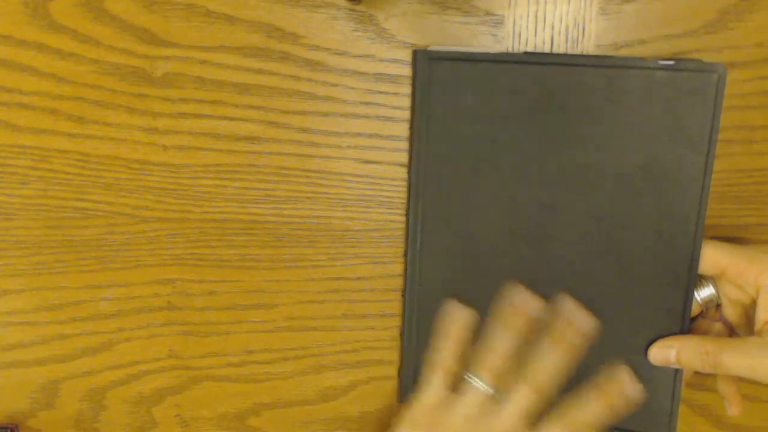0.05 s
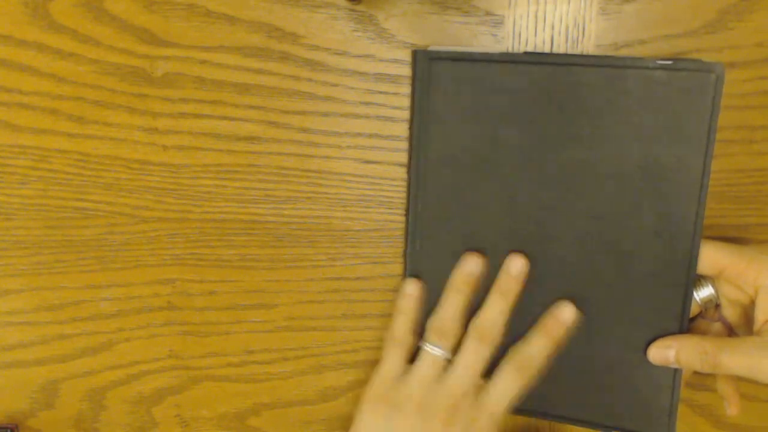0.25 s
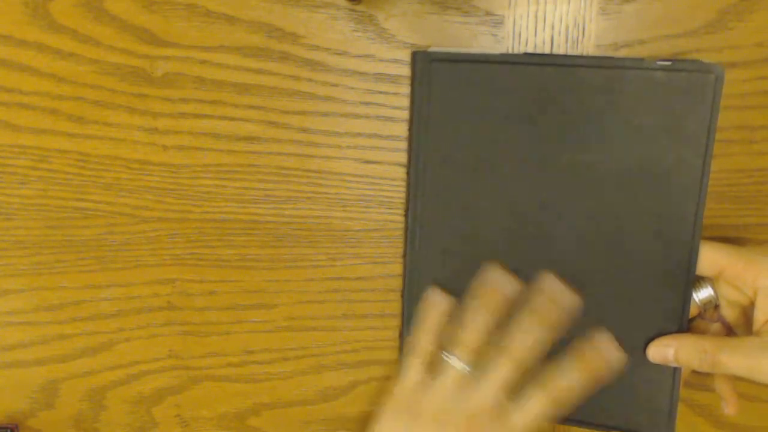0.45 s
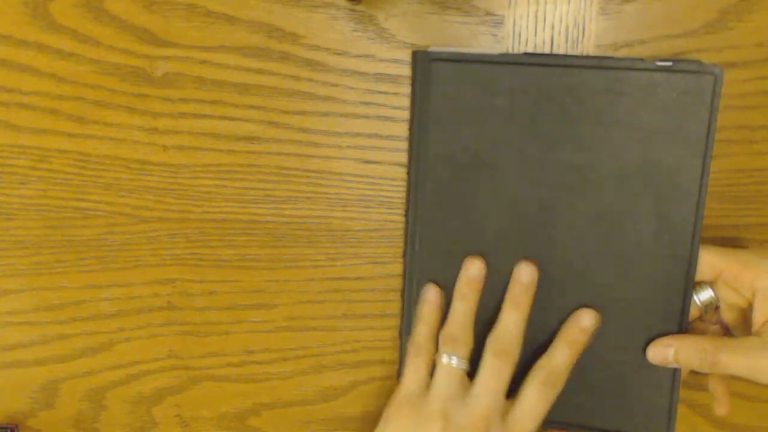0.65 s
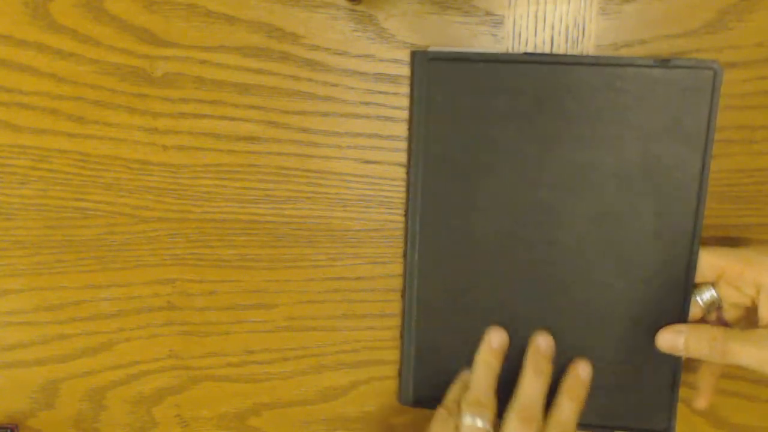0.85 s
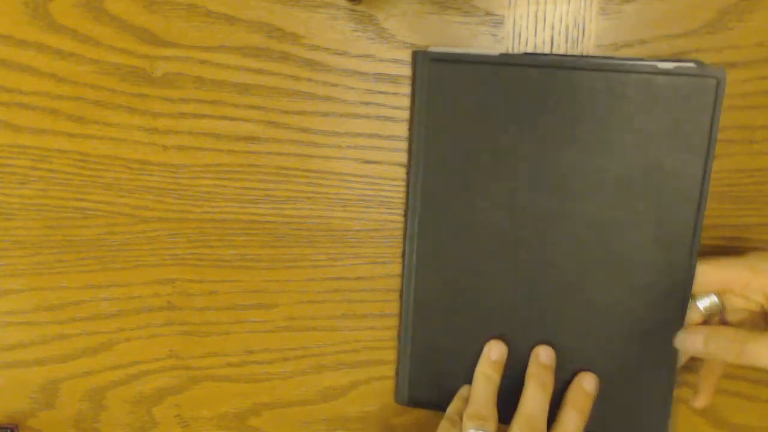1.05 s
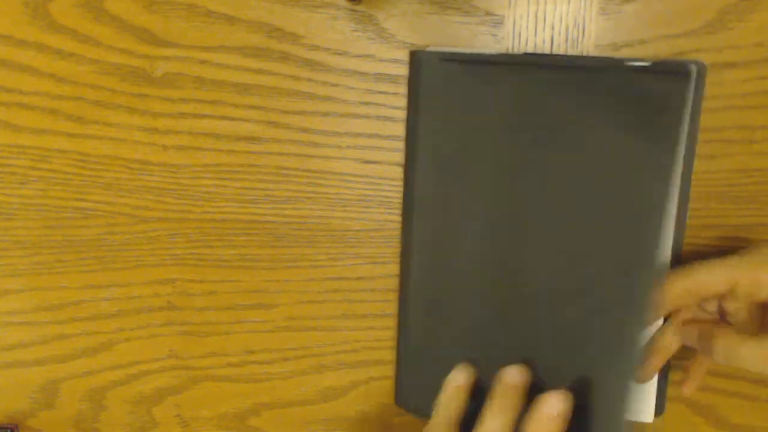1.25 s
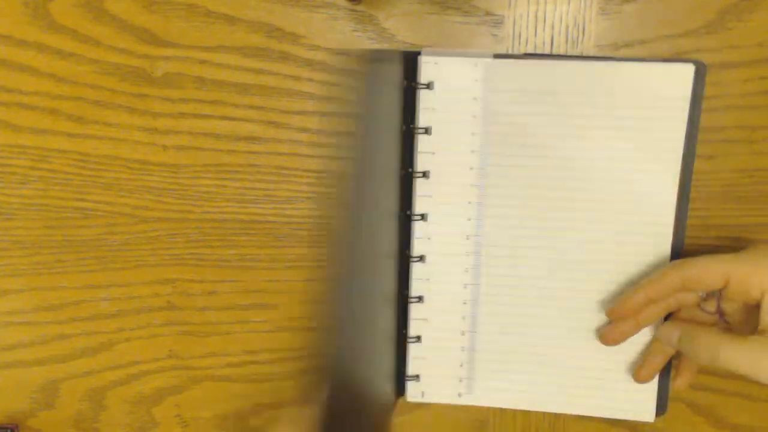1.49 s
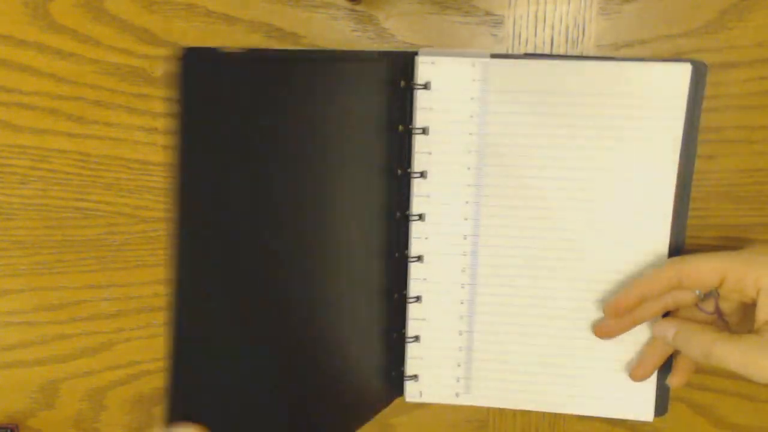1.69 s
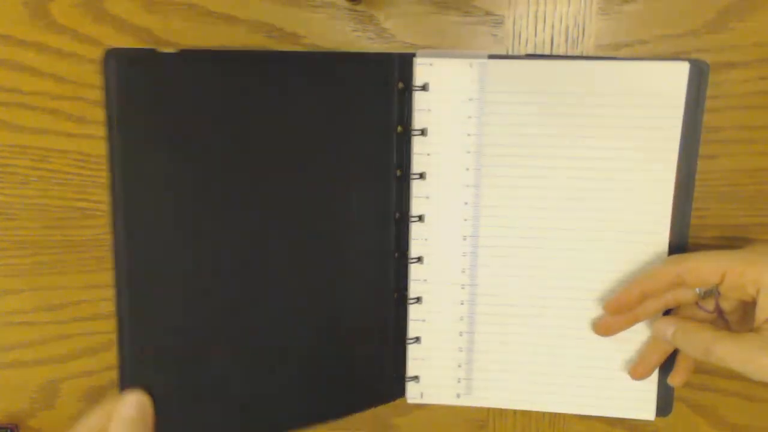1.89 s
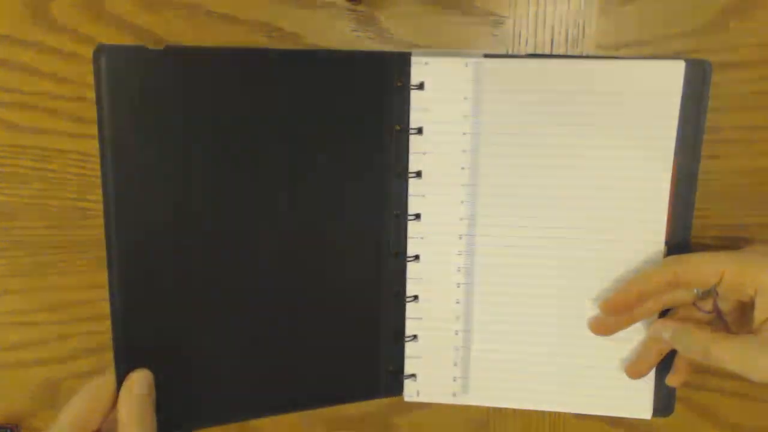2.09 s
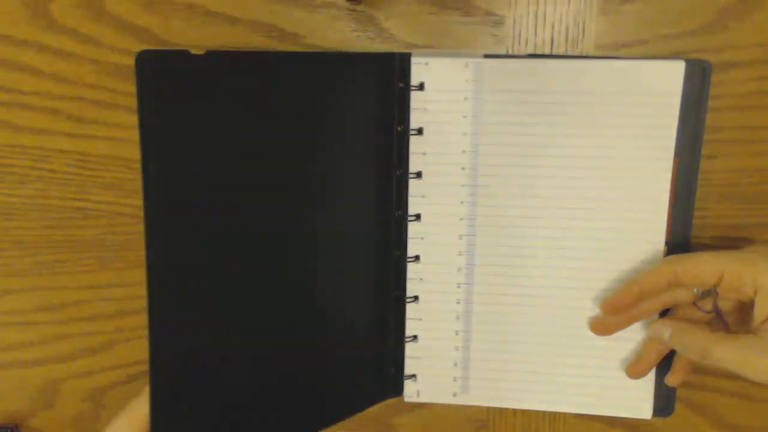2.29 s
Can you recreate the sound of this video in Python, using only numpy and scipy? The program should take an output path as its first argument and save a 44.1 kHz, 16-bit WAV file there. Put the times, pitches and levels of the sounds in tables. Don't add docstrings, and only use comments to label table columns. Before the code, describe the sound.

Notebook cover opening, heard close: soft dry to-and-fro skin strokes, a light knock, a pop with a low puff of air, a brief bright scraping snap, faint sliding and a woody thump over low room hum.

```python
import sys
import numpy as np
from scipy import signal
from scipy.fft import rfft, irfft, next_fast_len
from scipy.io import wavfile
from scipy.ndimage import map_coordinates

SR = 44100
rng = np.random.default_rng(int(sys.argv[2]) if len(sys.argv) > 2 else 0)


def volts_from_decibels(level):
    exponent = np.asarray(level, float) / 20
    return 10 ** exponent


def generate_wav(sig):
    pcm = np.round(np.clip(np.atleast_2d(sig).T, -1, 1) * 32767).astype(np.int16)
    wavfile.write(sys.argv[1], SR, pcm)


N = 102885


def unit(x):
    return x / np.sqrt(np.mean(x ** 2) + 1e-20)


def along(points, hz):
    f, v = np.transpose(points)
    return np.interp(np.log(hz + 1), np.log(f + 1), v)


def filtered(x, response):
    m = next_fast_len(len(x) + 8192)
    spectrum = rfft(x, m) * response(np.fft.rfftfreq(m, 1 / SR))
    return irfft(spectrum, m)[:len(x)]


def peak(f, hz, width_hz):
    return 1j * f * width_hz / (hz * hz - f * f + 1j * f * width_hz)


def wobble(rate_hz):
    return map_coordinates(rng.standard_normal(N // 8), [np.arange(N) * rate_hz / SR])


def arch(start_s, length_s, shape):
    u = np.clip((np.arange(N) / SR - start_s) / length_s, 0, 1)
    return np.abs(np.sin(np.pi * u)) ** shape


def add(track, s, sound):
    track[round(s * SR):][:len(sound)] += sound[:len(track) - round(s * SR)]


def ring(modes, attack_s):
    t = np.arange(SR // 2) / SR
    tones = sum(volts_from_decibels(db - 60 * t / t60_s) * np.sin(2 * np.pi * hz * t) for hz, db, t60_s in modes)
    return tones * (1 - np.exp(-t / attack_s))


def room_tone():
    # (frequency [Hz], density [dB per Hz])
    hiss_points = [(18, -26.5), (30, 1), (64, -22.5), (413, -22.5), (816, -28.5), (1030, -26), (1340, -35),
                   (1940, -36.5), (15800, -51.5)]
    # (centre [Hz], width [Hz], level [dB])
    fan_bands = [(102.6, 14, 6), (125.7, 23, 4), (227.7, 40, -1.5), (450, 69, -8.5), (1083, 45, -3),
                 (1184, 137, -4), (1633, 350, -13), (1937, 150, -11.5)]
    hiss_db, drone_db, sway_db = -65.5, -68.5, -52.5
    sway_hz, sway_width_hz = 13, 8

    def fan(f):
        return sum(volts_from_decibels(db) * peak(f, hz, width_hz) ** 2 for hz, width_hz, db in fan_bands)

    hiss = unit(filtered(rng.standard_normal(N), lambda f: volts_from_decibels(along(hiss_points, f))))
    drone = unit(filtered(rng.standard_normal(N), fan))
    sway = unit(filtered(rng.standard_normal(N), lambda f: peak(f, sway_hz, sway_width_hz) ** 4))
    hiss *= volts_from_decibels(hiss_db + 0.27 * wobble(4.3))
    drone *= volts_from_decibels(drone_db + 0.46 * wobble(7.2))
    return hiss + drone + volts_from_decibels(sway_db) * sway


def reverb(x):
    # (frequency [Hz], t60 [s])
    decay = [(200, 0.75), (2000, 0.31), (10000, 0.12)]
    hz, t, z = signal.stft(rng.standard_normal(SR // 2), SR, nperseg=256)
    z = z * volts_from_decibels(-60 * t / along(decay, hz)[:, None])
    tail = signal.istft(z, SR, nperseg=256)[1]
    delayed = np.pad(x, (200, 0))
    return signal.fftconvolve(delayed, tail / np.linalg.norm(tail))[:N]


def rattle():
    # (time [s], length [s], level [dB], centre [Hz], width [Hz])
    flutters = [(-.1, 0.38, -70, 496, 507), (-.05, 0.27, -69.5, 1894, 250), (0.014, .09, -72, 5130, 300),
                (1.263, .07, -57.5, 1160, 200), (1.269, 0.053, -73.5, 4900, 400),
                (1.271, 0.052, -68, 12700, 1200), (1.318, 0.018, -76, 11400, 505),
                (1.44, 0.044, -70.5, 12500, 1500), (1.445, 0.029, -67, 4570, 310),
                (1.56, 0.035, -51, 940, 247.6), (1.634, 0.11, -70.5, 1140, 150),
                (1.89, 0.089, -88.5, 3560, 400), (2.0, 0.077, -69, 1093, 307),
                (2.014, 0.021, -73.5, 3400, 700), (2.054, 0.13, -77, 4280, 450),
                (2.155, 0.028, -73.5, 4425, 450)]
    out = np.zeros(N)
    for s, length_s, db, hz, width_hz in flutters:
        flutter = unit(filtered(rng.standard_normal(N), lambda f: peak(f, hz, width_hz) ** 2))
        out += volts_from_decibels(db + 3.2 * wobble(180)) * arch(s, length_s, 0.92) * flutter
    return out


def puffs():
    # (time [s], level [dB], frequency [Hz], t60 [s])
    air = [
        (1.262, -34.5, 52, 0.18),
        (1.269, -46.5, 30, .4),
        (1.451, -51.5, 45, .25),
    ]
    out = np.zeros(N)
    for s, db, hz, t60_s in air:
        add(out, s, -ring([(hz, db, t60_s)], attack_s=.006))
    return out


def taps():
    # (time [s], peak level [dB], brightness [Hz])
    hits = [
        (0.9672, -39, 680),
        (1.2592, -35.5, 573),
        (1.577, -47.5, 1000),
        (2.154, -33, 1540),
    ]
    # (frequency [Hz], level [dB], t60 [s])
    table_modes = [(151, -17.5, 0.14), (185.7, -7, 0.2), (214.2, -2, 0.15), (287.8, 1.5, 0.084),
                   (336, -2.5, 0.11), (400, 2, 0.078), (480.7, -1.5, .09), (571, -2, .07), (656, -0.5, .06),
                   (848, -5.5, 0.083), (1080, -2.5, 0.041), (1290, 5.5, 0.039), (1560, -10.5, .03)]
    contact_t60_s, mode_spread = 0.025, .04
    t = np.arange(2000) / SR
    out = np.zeros(N)
    for s, db, hz in hits:
        modes = [(f * (1 + mode_spread * rng.normal()), level + rng.normal(0, 0.81), t60_s)
                 for f, level, t60_s in table_modes]
        contact = 0.027 * rng.standard_normal(len(t)) * volts_from_decibels(-60 * t / contact_t60_s)
        contact[0] = -1
        body = signal.fftconvolve(ring(modes, attack_s=.0008), contact)
        soft = filtered(body, lambda f: 1 / (1 + 1j * f / hz * 1.4 - (f / hz) ** 2) ** 2)
        add(out, s, volts_from_decibels(db - 10.5) * soft)
    return out


def pop():
    # (frequency [Hz], level [dB], t60 [s])
    cover_modes = [(1183, -8, 0.093), (1455, 9, 0.012), (1890, -2, 0.037), (3017, -12.5, 0.012),
                   (4453, -11, 0.016), (10540, -6, .012)]
    pop_s, pop_db = 1.2578, -38.5
    peel_db, peel_rise_s, peel_fall_s = -43.5, 0.00091, 0.0011
    out = np.zeros(N)
    add(out, pop_s, volts_from_decibels(pop_db) * ring(cover_modes, attack_s=0.00053))
    lag_s = np.arange(N) / SR - pop_s - .001
    crack = np.exp(-np.abs(lag_s) / np.where(lag_s < 0, peel_rise_s, peel_fall_s))
    return out + volts_from_decibels(peel_db) * crack * rng.standard_normal(N)


def scrape():
    # (time [s], level [dB])
    force = [
        (1.528, -62.5),
        (1.538, -30),
        (1.558, -23.5),
        (1.574, -47),
        (1.6, -63),
    ]
    # (frequency [Hz], density [dB per Hz])
    plastic = [(290, -68), (500, -24), (1100, -17), (1350, -22), (1730, -16), (3710, -21), (9190, -3.5),
               (14900, -17), (16500, -31.5)]
    slip_rate_hz, scatter_db = 14000, 2.2
    s, force_db = np.transpose(force)
    slips = (rng.random(N) < slip_rate_hz / SR) * rng.standard_normal(N)
    slips *= volts_from_decibels(scatter_db * rng.exponential(size=N))
    crackle = unit(filtered(slips, lambda f: volts_from_decibels(along(plastic, f))))
    return volts_from_decibels(np.interp(np.arange(N) / SR, s, force_db, -200, -200) - 3.5) * crackle


def snaps():
    # (time [s], peak level [dB], centre [Hz])
    big_slips = [(.915, -57, 13000), (1.2024, -61, 14000), (1.5116, -43, 13000), (1.516, -51, 13500),
                 (1.5225, -42, 13440), (1.5312, -36, 6000), (1.5482, -14, 9000), (1.5543, -15.5, 9000),
                 (1.5551, -6.5, 9500), (1.561, -16, 8500), (1.5821, -47.5, 6000), (2.143, -61, 11000),
                 (2.169, -60, 9000), (2.208, -55, 12000)]
    t60_s = 0.0064
    t = np.arange(400) / SR
    out = np.zeros(N)
    for s, db, hz in big_slips:
        burst = rng.standard_normal(400) * volts_from_decibels(-60 * t / t60_s)
        burst = filtered(burst, lambda f: peak(f, hz, 1.3 * hz) ** 2)
        add(out, s, volts_from_decibels(db) * burst / np.abs(burst).max())
    return out


def rubbing():
    # (time [s], length [s], peak level [dB], brightness [Hz])
    strokes = [(-.04, 0.2, -61.5, 13500), (0.123, 0.19, -59.5, 20000), (0.306, 0.16, -61, 20000),
               (0.452, .15, -58, 20000), (0.595, .15, -63, 19900), (0.817, 0.31, -69.5, 12200),
               (1.149, 0.23, -73.5, 9000), (1.242, 0.071, -63, 20000), (1.392, 0.19, -67.5, 20000),
               (1.559, 0.19, -71.5, 11860), (1.602, 0.44, -71, 7080), (1.975, 0.31, -69, 3960)]
    # (frequency [Hz], density [dB per Hz])
    skin = [(530, -45), (900, -10.5), (1150, -5), (2080, -6), (2500, -19), (3110, -11.5), (14400, -12.5),
            (15900, -22.5), (16500, -33)]
    speed_power, grain_db = 1.21, 1
    out = np.zeros(N)
    for s, length_s, db, hz in strokes:
        slips = rng.standard_normal(N) * volts_from_decibels(grain_db * wobble(900) + 0.8 * wobble(40))
        slide = unit(filtered(slips, lambda f: volts_from_decibels(along(skin, f)) / (1 + (f / hz) ** 4)))
        out += volts_from_decibels(db) * arch(s, length_s, speed_power) * slide
    return out


def scene():
    reverb_db = -18.5
    near = rattle() + puffs() + taps() + pop() + scrape() + snaps() + rubbing()
    return (near + volts_from_decibels(reverb_db) * reverb(near) + room_tone())[None]


def roll_off(x):
    return signal.sosfilt(signal.butter(12, 16670, fs=SR, output="sos"), x)


def record(dry):
    top_hz, shelf_hz, shelf_db = 16600, 15900, -22
    mix = filtered(dry[0], lambda f: (f < top_hz) * np.where(f < shelf_hz, 1, volts_from_decibels(shelf_db)))
    return roll_off(mix[None])


dry = scene()
out = record(dry)
generate_wav(out)
```